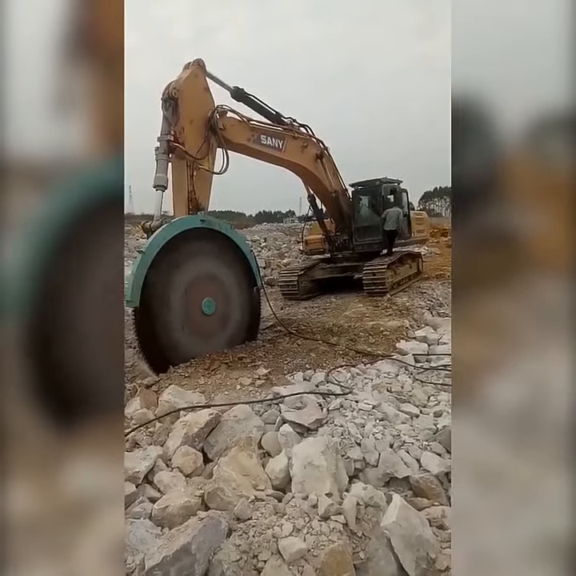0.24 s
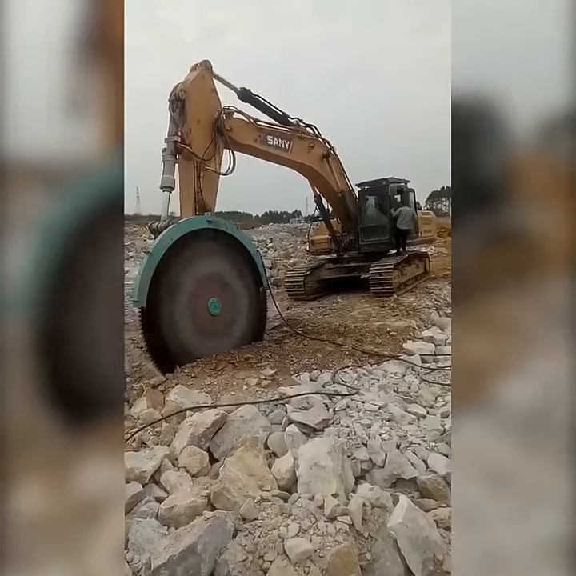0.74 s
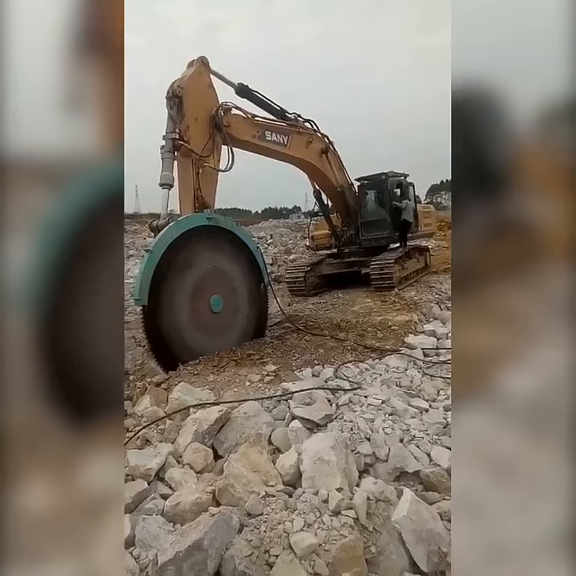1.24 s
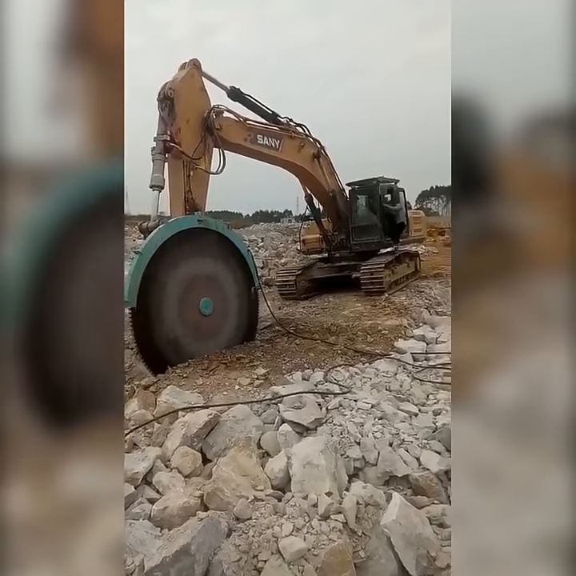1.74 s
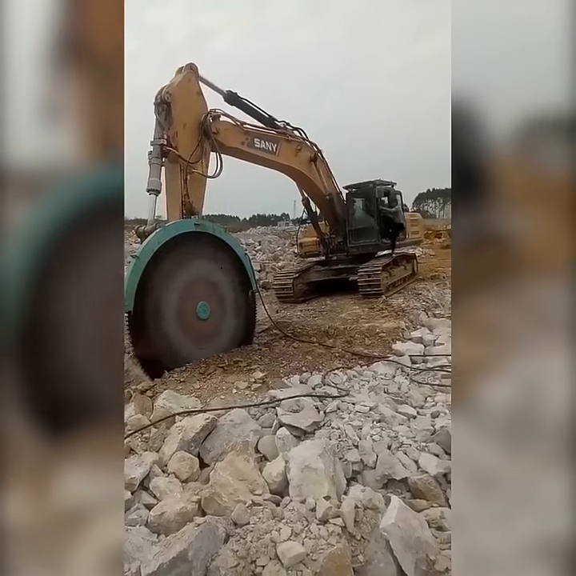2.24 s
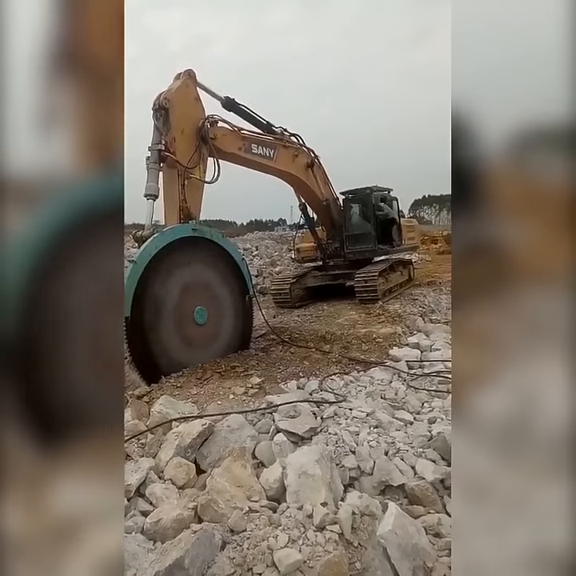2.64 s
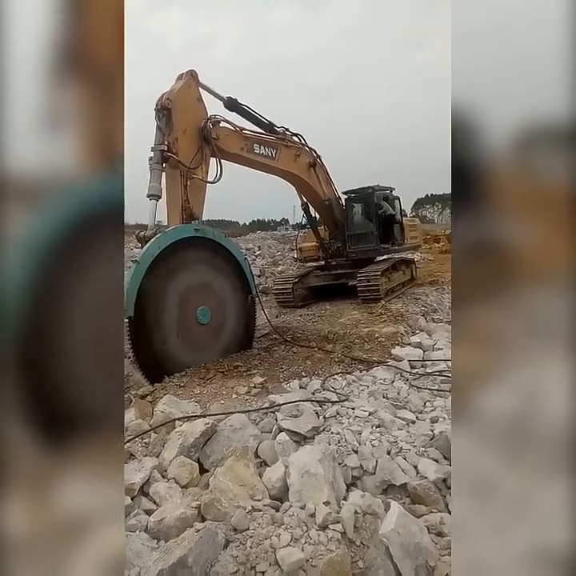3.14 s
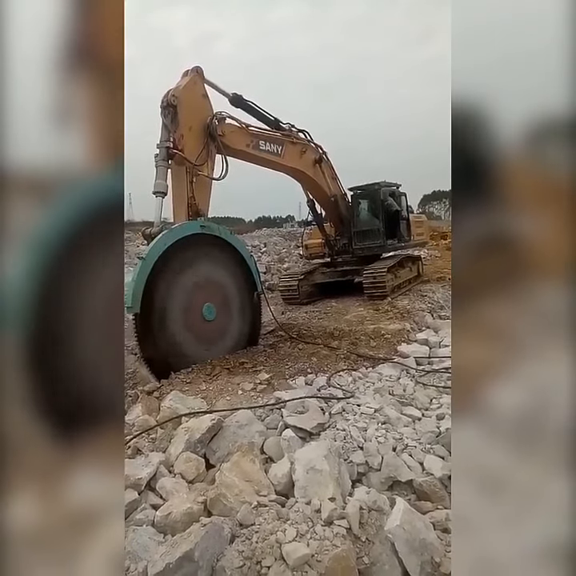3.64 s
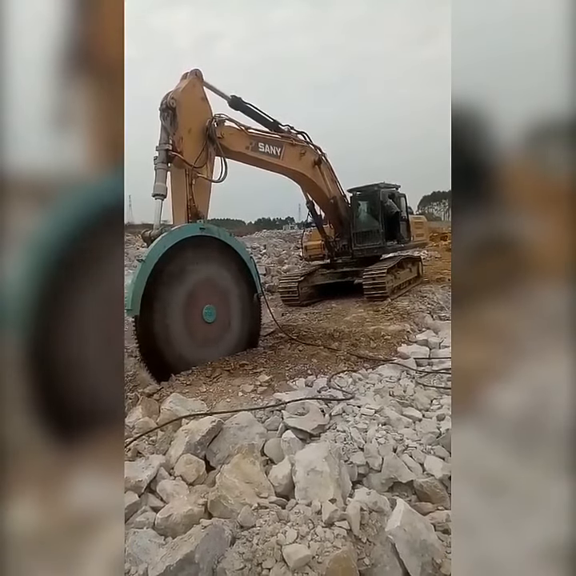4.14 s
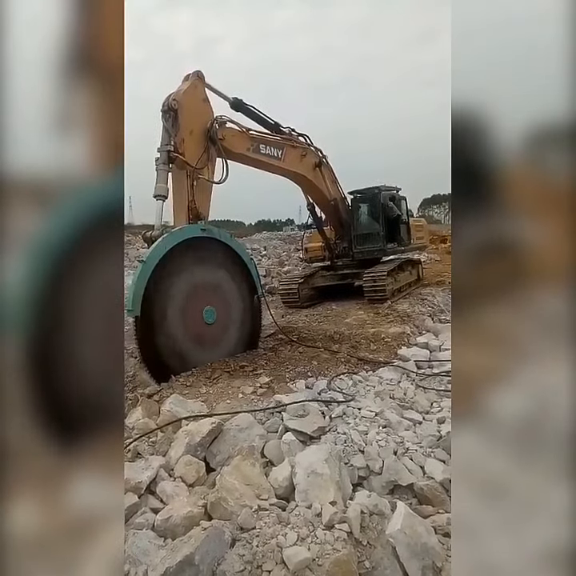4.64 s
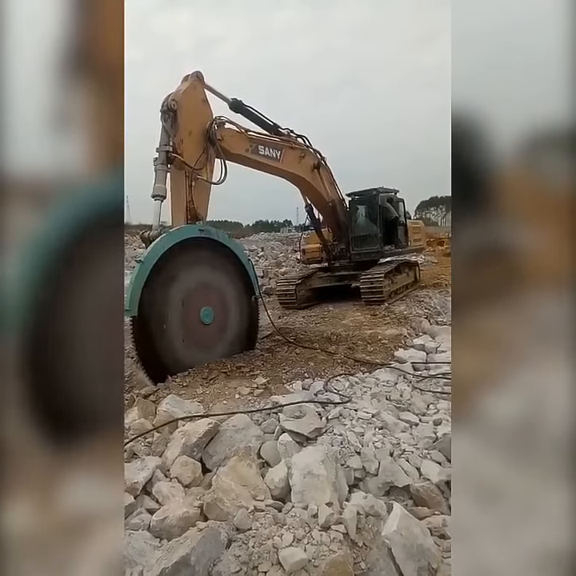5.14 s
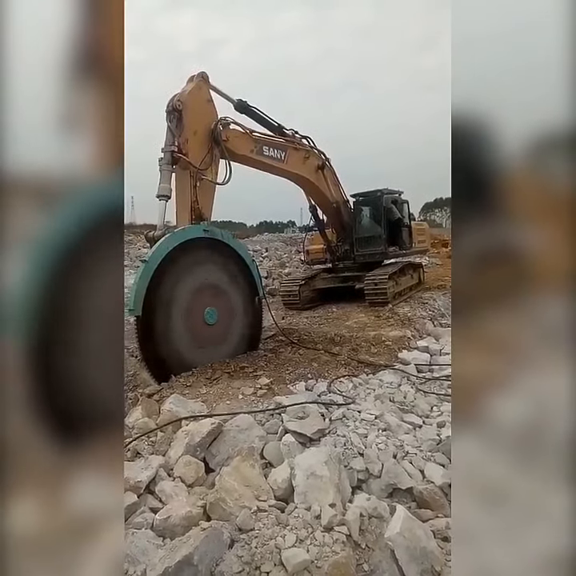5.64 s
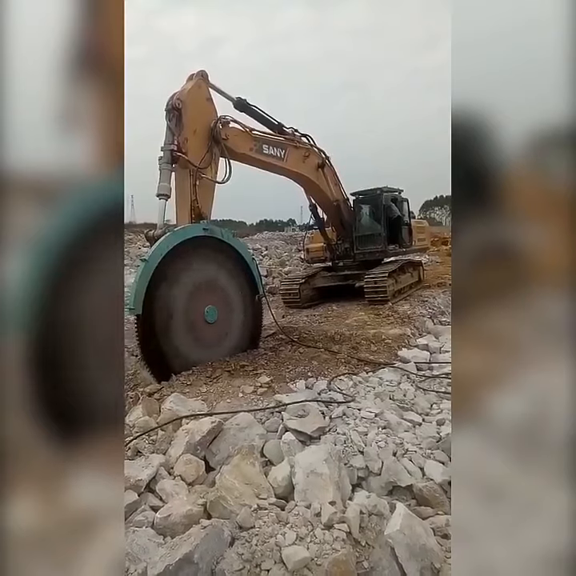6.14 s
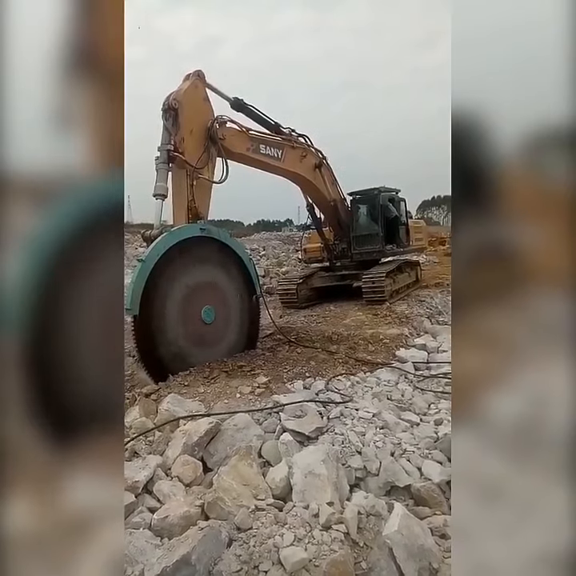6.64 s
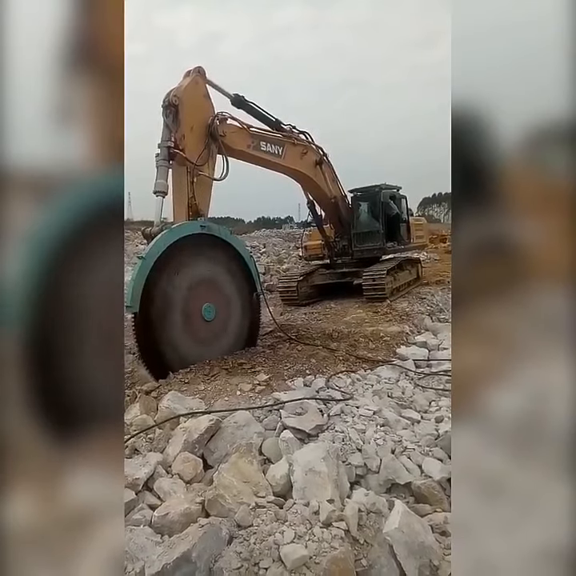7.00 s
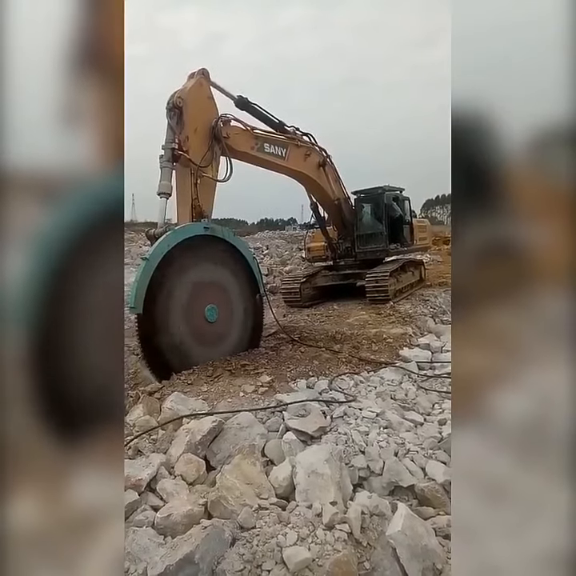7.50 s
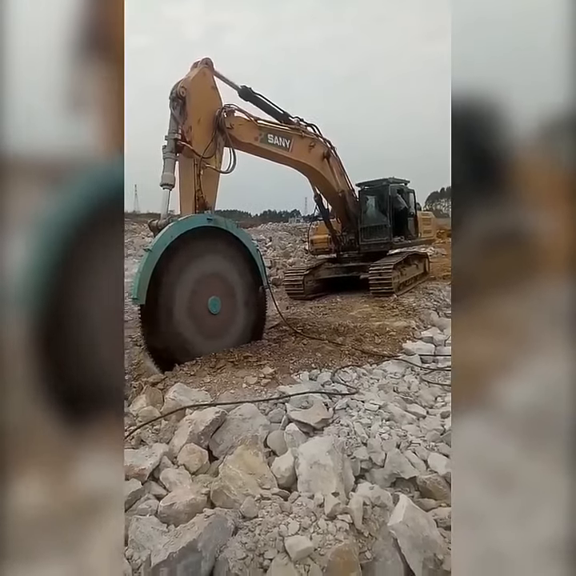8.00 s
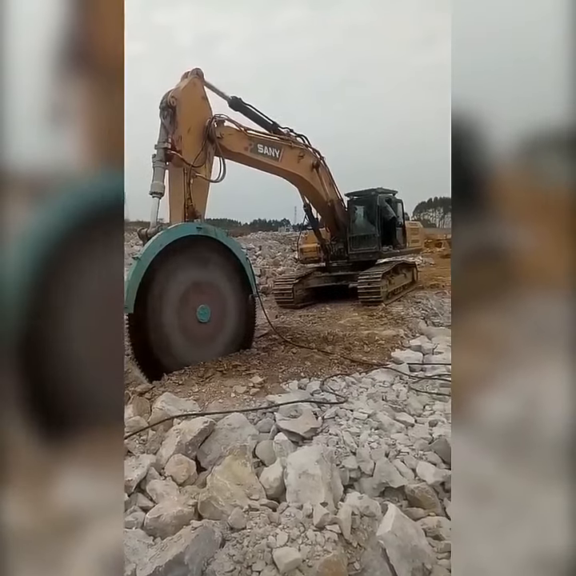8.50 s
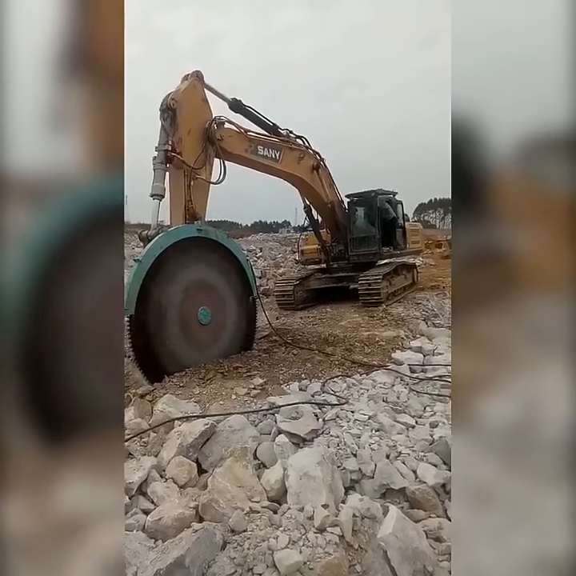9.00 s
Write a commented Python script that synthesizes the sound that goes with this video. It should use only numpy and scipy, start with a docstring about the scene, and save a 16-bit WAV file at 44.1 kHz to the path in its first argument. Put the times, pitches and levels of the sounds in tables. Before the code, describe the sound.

A huge circular saw grinds into stone with a loud, high, pulsing metallic screech over a droning diesel engine.

```python
"""A huge circular saw on an excavator arm grinds a slot into quarry stone; diesel and pump drone behind.
The blade is out of round: three and a half times a second the same proud teeth bite and the steel
screeches. At 0.7 s it seats and the pitch lifts, then sags as the slot deepens, while a lower screech,
rasping dust and crushed stone grow. The loudest screeches, around 2.5, 4.3 and 7.1 s, overload the
left microphone, which fizzes. Near 8 s the crushing eases off, and the saw grinds on."""
import sys
import numpy as np
from scipy import signal
from scipy.fft import rfft, irfft, next_fast_len
from scipy.io import wavfile
from scipy.ndimage import uniform_filter1d

SR = 44100
rng = np.random.default_rng(int(sys.argv[2]) if len(sys.argv) > 2 else 0)


def waveform_to_disk(signal):
    """Save audio, clipped to [-1, 1], as 16-bit WAV at the path in sys.argv[1]."""
    frames = np.transpose(np.atleast_2d(signal))
    scaled = np.clip(frames, -1, 1) * 32767
    samples = np.round(scaled).astype(np.int16)
    wavfile.write(sys.argv[1], SR, samples)


N = 408366
TURN_S = .2865   # about one turn of the blade

# The spin of the blade. Each row: time in seconds, turns done.
BLADE_TURNS = [(-.0942, 0), (4.2056, 15), (9.3625, 33)]
# The colour of rasping stone dust. Each row: frequency in Hz, level in dB.
DUST_SPECTRUM = [(1200, -115), (2000, -62), (2800, -60), (3300, -55), (4000, -54.5), (4600, -60),
                 (5000, -66.5), (5600, -79), (7000, -82), (15500, -103)]


def saw():
    """Feed, slot depth and the blade's spin drive the cut; the right microphone faces away from it."""
    # How hard the arm feeds the blade into the stone. Each row: time in seconds, bite in dB.
    feed = [(0, -4.5), (.75, -4), (1.1, -2), (2.5, 1.55), (3.2, -0.2), (4.3, 2.5), (5.5, -1.3), (7.1, 1.04),
            (8.4, -2.5), (9.26, -2.5)]
    # The shading of the saw on the right. Each row: frequency in Hz, gain in dB.
    saw_shade = [(800, 4.5), (1000, 0.5), (1300, -20.5), (1600, -10), (1850, -13), (2280, -7),
                 (2600, -27.5), (2900, -13.5), (3200, -14.5), (3800, -16), (4400, -19), (10000, -17.5)]
    t = np.arange(N) / SR
    turns, = read(BLADE_TURNS, t)
    bite_db, = read(feed, t)
    age = turns % 1 * TURN_S   # seconds into the turn
    shallow = np.exp(-t / 2.6)   # fades as the slot deepens
    unseated = 1 - step(t, at_s=.72, over_s=0.067)   # 1 until the blade settles in its slot
    # the warped flank brushes the slot twice a turn
    brush = bump(age, at_s=.14, half_s=0.037) + 0.9 * bump(age, at_s=0.249, half_s=0.013)
    rim = rim_screech(turns, age, shallow, unseated, bite_db)
    flank = flank_screech(turns, age, shallow, brush, bite_db)
    dust_gain = dust_swell(t, shallow, brush, bite_db)
    dust = dust_gain * dust_rasp(turns, age, unseated)
    steel = disc(rim + flank + dust, width_hz=9.6, level_db=-0.36)
    left = steel + crushed_stone(t, shallow, brush)
    left += from_db(7.0) * overload_fizz(steel, onset_db=-7.0, steepness=7.3)
    # dust and crushing spread over too wide an area to reach both microphones alike
    diffuse = from_db(-4.0) * dust_gain * colour(white(), DUST_SPECTRUM)
    diffuse += crushed_stone(t, shallow, brush)
    right = off_rubble(steel, direct_db=-10.5, rubble_db=-4.0, decay_s=0.021) + diffuse
    return np.array([left, colour(right, saw_shade)])


def rim_screech(turns, age, shallow, unseated, bite_db):
    """The rim and its proud teeth make the steel screech; the pitch sags as the slot deepens."""
    # The piercing band of rim friction. Each row: frequency in Hz, level in dB.
    spectrum = [(1500, -120), (1900, -86.5), (2250, -53), (2420, -41.5), (2600, -36.5), (2720, -41.5),
                (2900, -46), (3100, -62), (3600, -84), (5000, -130)]
    shallow_hz, deep_hz, unseated_hz = 110.8, -20, -185   # detuning
    friction = colour(rim_noise(turns, lasting=0.17, wearing=0.64, memory=0.834), spectrum)
    screech = from_db(bite_db + runout_db(age)) * sing(friction, evenness=0.29)
    teeth_gain = from_db(-3.5 + 0.78 * bite_db - 3 * unseated)
    teeth = teeth_gain * tooth_bites(rise_s=0.001427, scatter_db=1.0, jitter_s=.00003, detune=0.0059)
    detune_hz = deep_hz + (shallow_hz - deep_hz) * shallow + unseated_hz * unseated
    return shifted(screech + teeth, detune_hz)


def runout_db(age):
    """Once a turn the high side of the rim bites with an accent, holds, and leaves the stone."""
    attack_s, hold_s, release_s, accent_s = 0.0056, 0.094, 0.13, 0.026
    contact_db, clear_db = 2, -5
    contact = np.clip(np.minimum(age / attack_s, 1 - (age - attack_s - hold_s) / release_s), 0, 1)
    accent_db = 1.5 * np.exp(-age / accent_s)
    worn_db = -3.5 * bump(age, at_s=0.054, half_s=.011)   # a worn stretch bites less
    return clear_db + (contact_db - clear_db + accent_db) * contact + worn_db


def rim_noise(turns, lasting, wearing, memory):
    """Friction that repeats with each turn: a lasting share, a share that wears away, and fresh noise."""
    size, count = round(TURN_S * SR), int(turns[-1]) + 1
    worn = rng.standard_normal((count, size))
    for k in range(1, count):
        worn[k] = memory * worn[k - 1] + np.sqrt(1 - memory ** 2) * worn[k]
    rim = np.sqrt(lasting) * rng.standard_normal(size) + np.sqrt(wearing) * worn
    passing = rim.ravel()[(turns * size).astype(int)]
    return passing * np.sqrt(SR / 2) + np.sqrt(1 - lasting - wearing) * white()


def sing(x, evenness):
    """Friction feeds the ring until it saturates, so its loudness is more even than that of noise."""
    envelope = np.abs(signal.hilbert(x, next_fast_len(N))[:N])
    even = x / (uniform_filter1d(envelope, size=90) + 1e-9) ** evenness
    return even * np.std(x) / np.std(even)


def tooth_bites(rise_s, scatter_db, jitter_s, detune):
    """Each proud tooth gives a short swelling ring once a turn, never quite alike."""
    # The proud teeth. Each row: place in the turn in seconds, relative peak in dB, ring in Hz.
    teeth = [(.0033, -2.5, 2280), (.0098, -2.5, 2630), (.0135, 5.5, 2540), (0.0237, -3, 2473),
             (.0267, -3.5, 2616), (0.0368, -6, 2510), (0.0515, -0.5, 2370), (0.077, 1.5, 2472),
             (.083, -10.5, 2250), (.0867, -7, 2490), (0.0914, -1, 2630), (0.1332, -7, 2570),
             (0.1561, -2.5, 2460)]
    clock, done = np.transpose(BLADE_TURNS)
    age = np.arange(SR // 60) / SR
    swell = (age / rise_s * np.exp(1 - age / rise_s)) ** 2
    out = np.zeros(N + len(age))
    for turn_start in np.interp(np.arange(done[-1]), done, clock):
        for place_s, db, hz in teeth:
            force, late, sharp = rng.standard_normal(3)
            at = round((turn_start + place_s - rise_s + jitter_s * late) * SR)
            if 0 <= at < N:
                ring = np.sin(2 * np.pi * hz * (1 + detune * sharp) * age)
                out[at:at + len(age)] += from_db(db + scatter_db * force) * swell * ring
    return out[:N]


def disc(x, width_hz, level_db):
    """The steel disc rings on in its narrow modes."""
    # The lasting modes of the disc. Each row: frequency in Hz, level in dB against the direct sound.
    modes = [(2056, -10.5), (2261, -9), (2324, 2.5), (2369, -1.5), (2496, 3), (2595, 1.5), (2642, -2),
             (2665, 1.5), (2725, -15.5), (2772, 0.5), (3896, 0), (4030, -12), (4312, -11), (4519, 6)]
    radius = np.exp(-np.pi * width_hz / SR)
    zeros = np.array([1, 0, -1]) * (1 - radius ** 2) / 2
    out = x
    for hz, db in modes:
        poles = [1, -2 * radius * np.cos(2 * np.pi * hz / SR), radius ** 2]
        out = out + from_db(db) * signal.lfilter(zeros, poles, x)
    return from_db(level_db) * out


def flank_screech(turns, age, shallow, brush, bite_db):
    """The catching flank answers each bite with a lower screech, louder in a deeper slot."""
    # The darker band of flank friction. Each row: frequency in Hz, level in dB.
    spectrum = [(1200, -120), (1600, -94.5), (1880, -61.5), (2030, -48), (2250, -43), (2400, -44.5),
                (2800, -76), (4000, -130)]
    catch = bump(age, at_s=0.116, half_s=0.015)   # it catches hard on the first brush
    level_db = -2.13 - 10 * shallow + 0.19 * bite_db + 3 * brush + 8.5 * catch
    friction = rim_noise(turns, lasting=0.093, wearing=0.73, memory=0.81)
    return from_db(level_db) * colour(friction, spectrum)


def dust_rasp(turns, age, unseated):
    """Dust rasps along the flanks, with a thin squeal that falls through every turn."""
    seated_hz, unseated_hz, sag_hz_per_s = 4612, 3515, 1800
    squeal_hz = seated_hz + (unseated_hz - seated_hz) * unseated - sag_hz_per_s * age
    rasp = colour(rim_noise(turns, lasting=0.035, wearing=0.2, memory=0.49), DUST_SPECTRUM)
    return rasp + from_db(-28.5) * squeal(squeal_hz, width_hz=160, flicker_db=3.5)


def dust_swell(t, shallow, brush, bite_db):
    """The gain of the rasp: it rises with depth, feed and each brush, and surges as dust builds up."""
    # Dust building up in the slot. Each row: centre in seconds, half length in seconds, lift in dB.
    surges = [(.2, 0.4, 3.5), (3.96, 0.19, 1), (6.407, 0.26, 1.5)]
    surge_db = sum(db * bump(t, at_s, half_s) for at_s, half_s, db in surges)
    return from_db(-0.42 - 2.9 * shallow + 3 * brush + 0.11 * bite_db + surge_db)


def squeal(hz, width_hz, flicker_db):
    """The flank of the blade slips in the slot: a narrow, fitful band around a moving pitch."""
    band = signal.sosfilt(signal.butter(2, width_hz, fs=SR, output="sos"), white() + 1j * white())
    tone = np.real(band * np.exp(2j * np.pi * np.cumsum(hz) / SR))
    return tone / np.std(band.real) * from_db(flicker_db * drift(18))


def crushed_stone(t, shallow, brush):
    """Stone is crushed deep in the slot, swelling with each brush and easing off late in the cut."""
    # The midrange roar of crushing. Each row: frequency in Hz, level in dB.
    spectrum = [(300, -105), (650, -77.5), (800, -78.5), (1000, -72), (1300, -62), (1580, -57.5),
                (1850, -61.5), (2300, -65), (3500, -115)]
    eased = step(t, at_s=7.94, over_s=.2)
    return from_db(1.03 - 2 * shallow + 2.6 * brush - 2.5 * eased) * colour(white(), spectrum)


def overload_fizz(steel, onset_db, steepness):
    """Distortion fizz from the overloaded left microphone flares up on the loudest screeches."""
    # The colour of the overload products. Each row: frequency in Hz, level in dB.
    spectrum = [(3000, -120), (5000, -73.5), (6500, -79.5), (7700, -78), (9000, -84), (11000, -88.5),
                (12800, -80.5), (15000, -88.5)]
    strength = np.sqrt(np.abs(uniform_filter1d(steel ** 2, size=1100))) / from_db(onset_db)
    return colour(white(), spectrum) * strength ** steepness / (1 + strength ** steepness)


def off_rubble(x, direct_db, rubble_db, decay_s):
    """A weak direct sound, six samples late, smeared by many small echoes off the rubble."""
    age = np.arange(SR // 6) / SR
    echoes = rng.standard_normal(len(age)) * np.exp(-age / decay_s)
    smear = signal.fftconvolve(x, echoes / np.linalg.norm(echoes))[:N]
    return from_db(direct_db) * np.roll(x, 6) + from_db(rubble_db) * smear


def excavator(hum_db, speed_wander, flutter_db):
    """Diesel and hydraulic pump: slightly unsteady tones over the rumble of exhaust and fan."""
    # Diesel firing and pump tones. Each row: frequency in Hz, relative level in dB.
    tones = [(134.6, -46.5), (226.1, -42.5), (269.2, -43.5), (312.2, -48.5), (543.7, -51)]
    # The rumble of exhaust and fan. Each row: frequency in Hz, level in dB.
    rumble = [(20, -71), (45, -75.5), (60, -77), (78, -63.5), (130, -59.5), (180, -60), (260, -57),
              (370, -54.5), (520, -61.5), (620, -73.5), (900, -72.5), (1600, -104.5), (6000, -125)]
    # The shading of the engine on the right. Each row: frequency in Hz, gain in dB.
    engine_shade = [(60, -9), (150, -7.5), (300, -10.5), (450, -14.5), (650, -8), (1000, -12.5)]
    run_time = np.cumsum(1 + speed_wander * drift(5)) / SR
    hum = np.zeros(N)
    for hz, db in tones:
        amplitude = np.sqrt(2) * from_db(db + hum_db + flutter_db * drift(12))
        hum += amplitude * np.sin(2 * np.pi * (hz * run_time + rng.random()))
    engine = hum + colour(white(), rumble)
    reflected = from_db(-7.5) * colour(white(), rumble)
    return np.array([engine, colour(engine + reflected, engine_shade)])


def from_db(db):
    """Decibels to gain."""
    return np.exp(np.asarray(db) * (np.log(10) / 20))


def read(rows, at):
    """The columns of a table, joined by straight lines."""
    key, *columns = np.transpose(rows)
    return [np.interp(at, key, column) for column in columns]


def colour(x, spectrum):
    """Filter by (Hz, dB) points on a log-frequency axis."""
    size = next_fast_len(N + 4096)
    hz, level = np.transpose(spectrum)
    bins = np.maximum(np.fft.rfftfreq(size, 1 / SR), 1)
    gain = from_db(np.interp(np.log(bins), np.log(hz), level))
    return irfft(rfft(x, size) * gain, size)[:N]


def shifted(x, hz):
    """Move every partial by the same number of Hz, which may change with time."""
    return np.real(signal.hilbert(x, next_fast_len(N))[:N] * np.exp(2j * np.pi * np.cumsum(hz) / SR))


def white():
    """Noise of 0 dB per Hz."""
    return rng.standard_normal(N) * np.sqrt(SR / 2)


def drift(rate_hz):
    """A slow random wander with a spread of about 1."""
    return np.interp(np.arange(N) / SR * rate_hz, np.arange(2000), rng.standard_normal(2000))


def bump(t, at_s, half_s):
    """A smooth swell of height 1."""
    return np.exp(-((t - at_s) / half_s) ** 2)


def step(t, at_s, over_s):
    """A smooth change from 0 to 1."""
    return .5 + .5 * np.tanh((t - at_s) / over_s)


def scene():
    """The saw in front, the machine behind it."""
    return saw() + excavator(hum_db=2.0, speed_wander=0.00289, flutter_db=3.0)


def record(dry):
    """The loudest bites are squeezed against full scale and crackle; the top is cut."""
    hardness, stopband_hz = 14.0, 16282
    squeezed = dry / (1 + np.abs(dry) ** hardness) ** (1 / hardness)
    return signal.sosfilt(signal.cheby2(16, 60, stopband_hz, fs=SR, output="sos"), squeezed)


dry = scene()
out = record(dry)
waveform_to_disk(out)
```